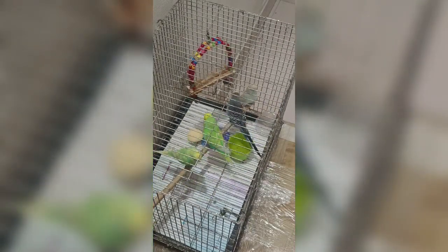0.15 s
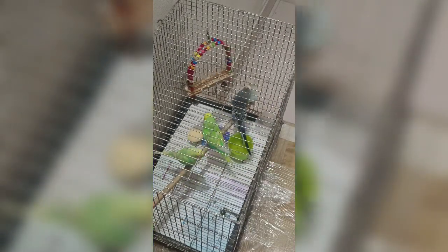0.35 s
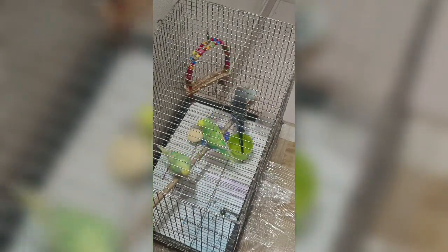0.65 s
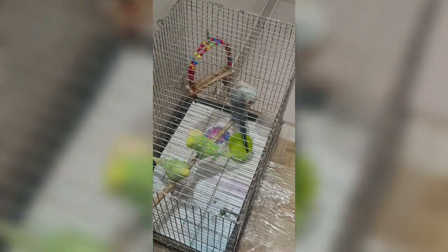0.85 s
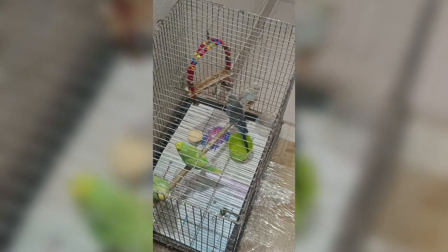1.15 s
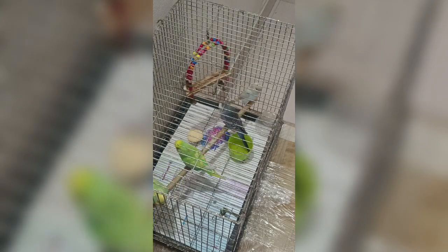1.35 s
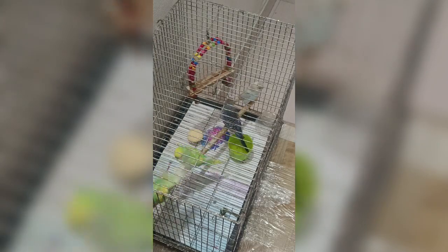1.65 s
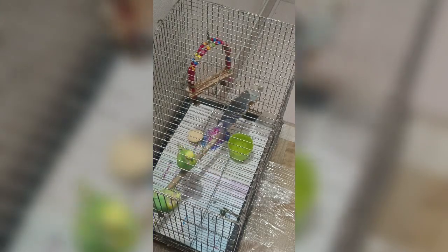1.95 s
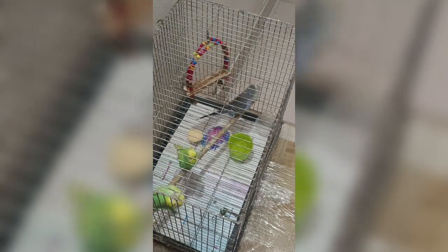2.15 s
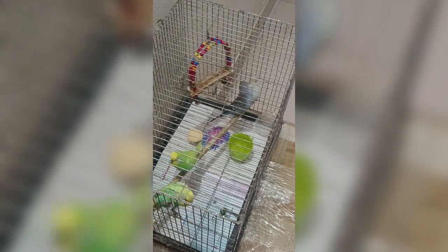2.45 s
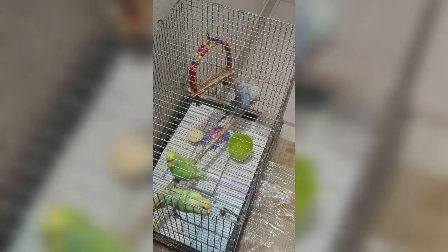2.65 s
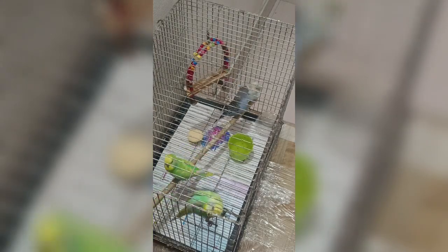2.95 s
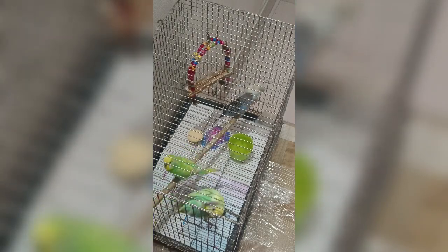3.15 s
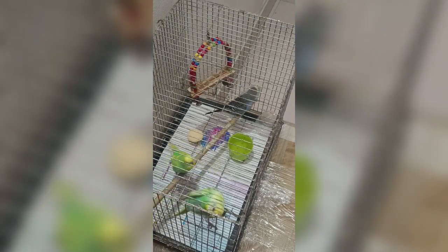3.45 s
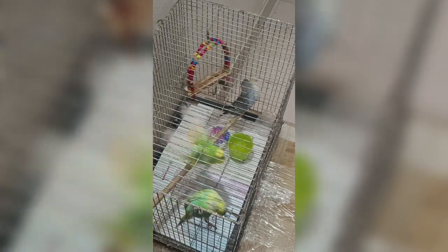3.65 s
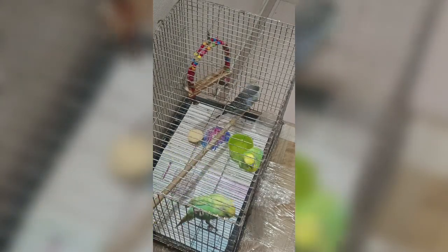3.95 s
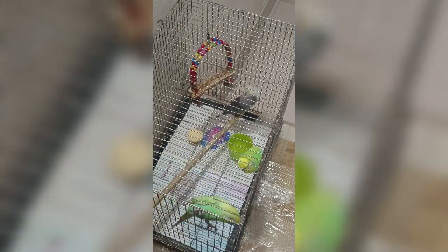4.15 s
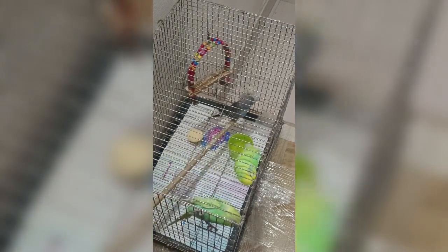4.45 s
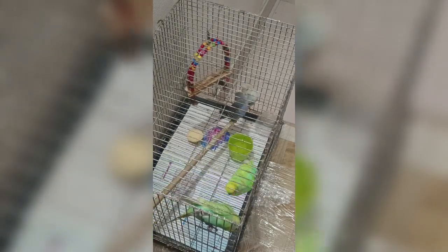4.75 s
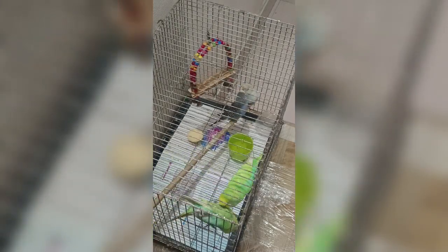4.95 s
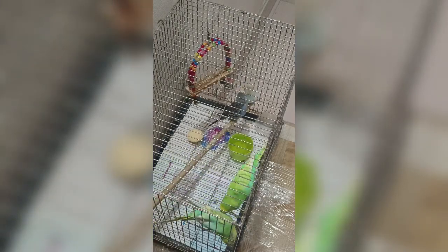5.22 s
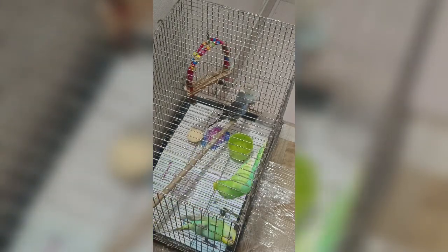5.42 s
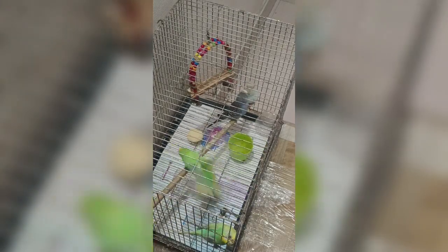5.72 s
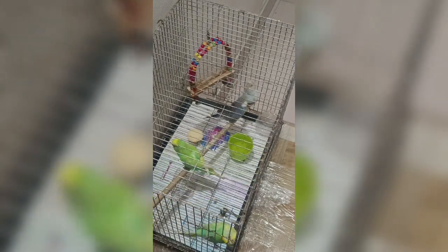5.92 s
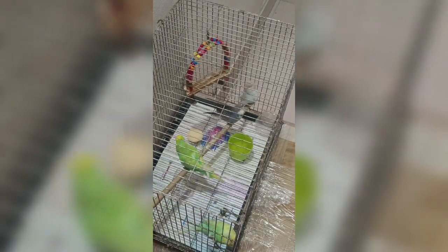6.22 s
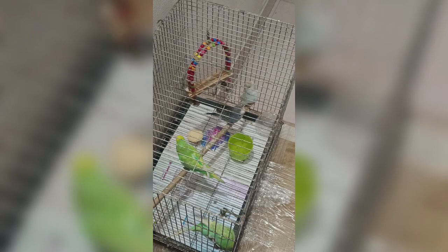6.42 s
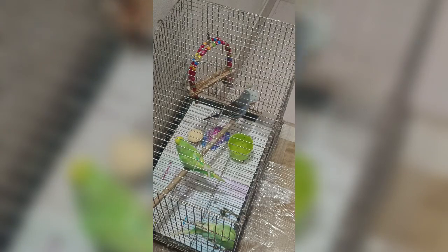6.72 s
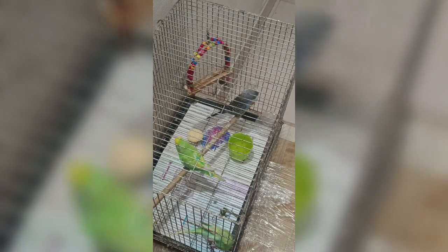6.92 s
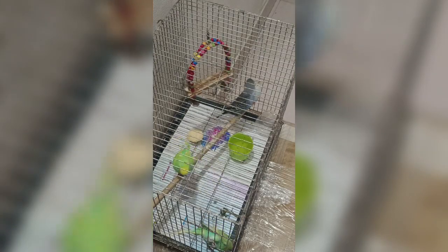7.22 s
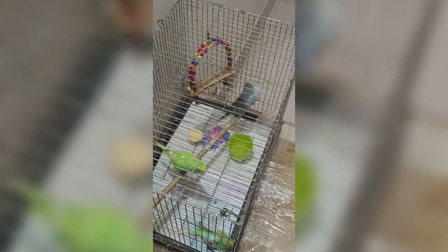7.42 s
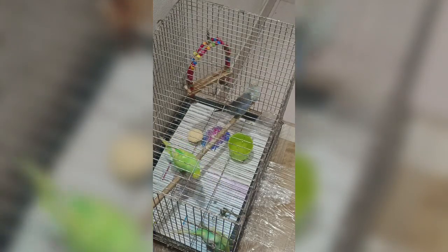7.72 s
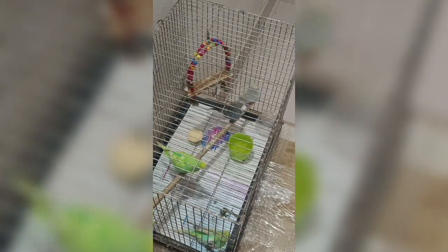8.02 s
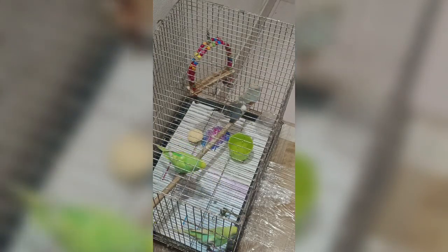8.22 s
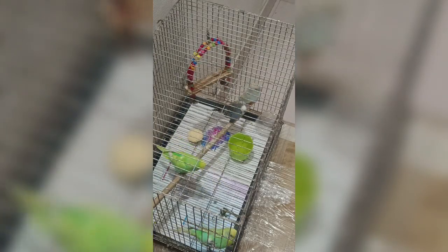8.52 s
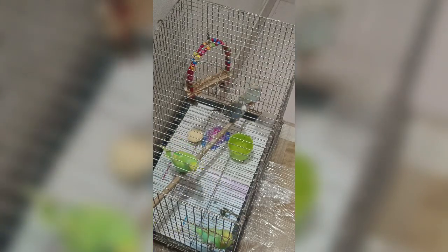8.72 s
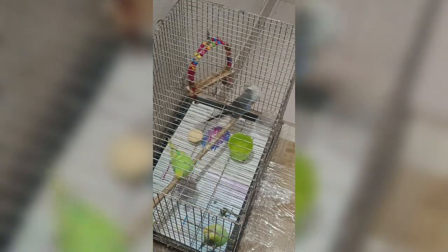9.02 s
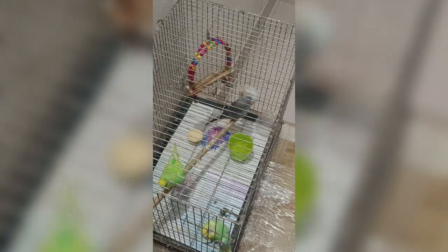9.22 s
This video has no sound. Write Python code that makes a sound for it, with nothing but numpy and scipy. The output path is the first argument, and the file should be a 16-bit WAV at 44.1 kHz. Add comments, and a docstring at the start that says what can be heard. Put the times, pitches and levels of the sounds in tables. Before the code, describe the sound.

Over a faint, steady machine hum, several small caged parrots trade quick high chirps, scratchy scolds and twittering warbles. An early scuffle brings a squawk and a rising whistle; the birds ease off, then overlap in busy runs with occasional soft coos and ringing taps on the wire. A burst of flapping comes late, amid continuing chatter. A handheld stereo microphone picks up the birds and the echo of the hard room.

```python
"""Small parrots chatter in a wire cage in a hard, echoing room while a machine hums far off. They open with
short gliding whistles, hoarse rasps, clicks on the wires and a scuffle; near 1 s comes a sharp squawk, then
a climbing whistle. After a lull the calls crowd and overlap, with a few low coos from 3.6 s on. Wings beat
hardest near 8 s, and the chatter runs to the end. All along, a handheld recorder's two sound openings
(ports) colour left and right differently, and it turns its low end down while the birds are loud."""
import sys
import numpy as np
from scipy import signal
from scipy.fft import rfft, irfft, next_fast_len
from scipy.io import wavfile
from scipy.ndimage import uniform_filter1d, minimum_filter1d, map_coordinates

SR = 44100
rng = np.random.default_rng(int(sys.argv[2]) if len(sys.argv) > 2 else 0)


def output_pcm(signal):
    """Save a mono or channel-first signal as 16-bit PCM at the path in sys.argv[1].

    Samples are clipped to [-1, 1] before scaling.
    """
    pcm = np.clip(np.atleast_2d(signal).T, -1, 1) * 32767
    wavfile.write(sys.argv[1], SR, np.round(pcm).astype(np.int16))


N = 413216
TOP_HZ, LEFT_LAG_S = 15800, 0.0003444  # highest pitch kept; how much later the left port hears


def amp(db):
    """Turns decibels into a number to multiply by."""
    return 10 ** (np.asarray(db) / 20)

def unit(x):
    """Scales x to an average strength (rms) of 1."""
    return x / np.sqrt(np.mean(x ** 2) + 1e-20)

def along(points, hz):
    """Reads between (f/Hz, value) points on a musical (log) scale."""
    f, v = np.transpose(points)
    return np.interp(np.log(hz + 1), np.log(f + 1), v)

def wobble(rate):
    """A smooth curve through `rate` random values a second."""
    coarse = np.arange(0, N + 16, 16)
    values = rng.standard_normal(int(N * rate / SR) + 5)
    return np.interp(np.arange(N), coarse, map_coordinates(values, [coarse * rate / SR]))

def filtered(x, response):
    """Scales or delays each frequency of x by response(hz)."""
    m = next_fast_len(N + SR // 2)
    return irfft(rfft(x, m) * response(np.fft.rfftfreq(m, 1 / SR)), m)[..., :N]

def add(track, s, sound):
    """Mixes a sound into a track at s seconds."""
    part = track[round(s * SR):][:len(sound)]
    part += sound[:len(part)]

def port_delay(hz):
    """The delay between the ports, half on each side."""
    return np.exp(-1j * np.pi * hz * LEFT_LAG_S * np.array([[1], [-1]]))

def noise(colour, patchy_db):
    """Noise with a (f/Hz, level/dB) colour and random louder and softer patches."""
    spectrum = signal.stft(rng.standard_normal(N), nperseg=256)[2]
    field = uniform_filter1d(rng.standard_normal(spectrum.shape), size=5, axis=0)
    field = uniform_filter1d(field, size=12, axis=1)
    patches = signal.istft(spectrum * amp(patchy_db * unit(field)), nperseg=256)[1][:N]
    return unit(filtered(patches, lambda hz: amp(along(colour, hz))))

def pips(s, hz, db, length_s=0.0158, glide=0.0279):
    """Tiny gliding tones of uneven strength, one at each time in s."""
    k = np.arange(round(length_s * SR))
    slide, loud, turn = rng.standard_normal((len(s), 3)).T[..., None]
    phase = 2 * np.pi * (hz[:, None] * (1 + glide * slide * k / len(k)) * k / SR + turn)
    tones = amp(db[:, None] + 5 * loud) * np.sin(np.pi * k / len(k)) ** 2 * np.sin(phase)
    at = np.round(s * SR).astype(int)[:, None] + k
    return np.bincount(at.ravel(), tones.ravel(), N + SR)[:N]


# The room's steady noise at each port: f/Hz, level/dB per Hz
LEFT_AIR = [(30, -100), (80, -101.5), (200, -88.5), (350, -90), (600, -100.5), (780, -83.5), (850, -65.5),
            (905, -62.5), (965, -67.5), (1020, -83), (1300, -107), (2300, -71.5), (3200, -105), (3800, -89),
            (4500, -117), (5300, -106), (6200, -130), (16000, -135)]
RIGHT_AIR = [(30, -91.5), (80, -85.5), (200, -90), (350, -91.5), (550, -101), (1900, -99), (4600, -114),
             (5400, -101), (7400, -122), (16000, -134)]
# How alike its two sides are: f/Hz, likeness (1 = the same)
AIR_LIKENESS = [(60, 0.9), (400, 1), (1000, 0.49), (3000, 0.074)]

def room_air():
    """Far air noise rings in each port; its treble flickers and its loudest band wavers."""
    turn = lambda hz: np.arccos(np.clip(along(AIR_LIKENESS, hz), -1, 1)) / 2
    share = lambda hz: np.array([np.cos(turn(hz)), np.sin(turn(hz))])
    mid, side = filtered(rng.standard_normal((2, N)), share)
    colour = lambda hz: np.sqrt(SR / 2) * amp([along(LEFT_AIR, hz), along(RIGHT_AIR, hz)])
    air = filtered(np.array([mid + side, mid - side]), lambda hz: colour(hz) * port_delay(hz))
    treble = filtered(air, lambda hz: 1 / (1 + (1600 / (hz + 1)) ** 8))
    flicker = amp(-1.5) * unit(amp(3.5 * wobble(15) + 3 * wobble(3)))
    band = filtered(air, lambda hz: np.exp(-((hz - 900) / 250) ** 2))
    waver = unit(amp(3 * wobble(8)))
    return air + (flicker - 1) * treble + (waver - 1) * band

# The machine's tones: f/Hz, width/Hz, level/dB
HUM_TONES = [(105.1, 8.5, -63.5), (135, 6.1, -73), (295, 45, -64), (415, 57, -72), (717, 8.1, -78)]

def machine_hum():
    """A far machine hums in narrow, wavering bands of noise; the higher ones lean left."""
    hum = np.zeros((2, N))
    for centre_hz, width_hz, db in HUM_TONES:
        tone = filtered(rng.standard_normal(N), lambda hz: np.exp(-((hz - centre_hz) / width_hz) ** 2))
        lean_db = (centre_hz - 200) / 80
        hum += amp([[db + lean_db], [db - lean_db]]) * unit(tone)
    return hum

# Time the far echo takes to fade by 60 dB: f/Hz, fade/s
ECHO_FADES = [(500, 0.7), (2500, 0.69), (4500, 0.58), (12000, 0.35)]

def room_echo(x, near_fade_s=0.23, far_db=-6):
    """The cage and nearest wall answer briefly, the rest of the room longer, differently at each port."""
    hz, t, spectrum = signal.stft(rng.standard_normal((2, SR // 2)), SR, nperseg=256)
    fade = amp(-60 * t / near_fade_s) + amp(far_db - 60 * t / along(ECHO_FADES, hz)[:, None])
    tail = signal.istft(spectrum * fade, SR, nperseg=256)[1]
    tail /= np.linalg.norm(tail[0])
    return signal.fftconvolve(np.pad(x, (300, 0))[None], tail, axes=1)[:, :N]

# Wings and feet on the cage floor, one list a scuffle: t/s, rattle level/dB, thump against rattle/dB
SCUFFLE_CURVES = [
    [(0.55, -42, -49), (.7, -38.5, -27), (0.93, -35, -43.5), (1.0, -66, 5)],
    [(3.87, -82, 3), (3.95, -76, 15.5), (4.04, -91, 3)],
    [(7.794, -41, -11), (7.806, -23.5, -29), (7.85, -23.5, -29), (7.9, -30.5, -15.5), (8.02, -33, -16),
     (8.25, -68, 0)],
    [(9.05, -44, -17), (9.224, -34, -34), (9.37, -53, -32)],
]

def scuffles():
    """Beating wings rattle the tray and thump the air."""
    rattle, thump = np.zeros((2, N))
    t = np.arange(N) / SR
    for rows in SCUFFLE_CURVES:
        s, db, thump_db = np.transpose(rows)
        rattle += amp(np.interp(t, s, db, -120, -120))
        thump += amp(np.interp(t, s, db + thump_db, -120, -120))
    beats = unit(amp(1.1 * wobble(40)))
    tray = noise([(550, -29), (700, -15), (900, 4.5), (1150, -8), (1700, -3), (2400, -2.5),
                  (4000, -91.5)], patchy_db=1.5)
    air = noise([(40, -35), (100, -4), (200, -23.5), (400, -3), (650, -13), (1500, -72)], patchy_db=1.5)
    return beats * (rattle * filtered(tray, port_delay) * amp([[3.5], [-3.5]]) + thump * air)

# Low, soft notes: t/s, level/dB, f/Hz
COO_NOTES = [(3.632, -39.5, 302), (3.799, -40.5, 393), (5.822, -32, 414), (8.021, -40.5, 439),
             (8.16, -46.5, 305), (9.172, -51.5, 349)]

def coos():
    """Soft, rough low notes that rise a little."""
    out = np.zeros(N)
    progress = np.linspace(0, 1, round(.075 * SR))
    flutter, waver = amp(8.2 * wobble(90)), wobble(70)
    for s, db, hz in COO_NOTES:
        shake = 1 + .05 * waver[round(s * SR):][:len(progress)]
        phase = 2 * np.pi * np.cumsum(hz * (.93 + 0.16 * progress) * shake) / SR
        tone = np.sin(phase) + 0.25 * np.sin(1.4 * phase)
        add(out, s - .01, amp(db - 4.5) * np.sin(np.pi * progress) * tone)
    return out * flutter

# Claws and beaks on the wire: t/s, level/dB, top f/Hz
WIRE_TAPS = [(.573, -22.5, 4700), (.667, -22.5, 5400), (0.775, -25.5, 5040), (1.361, -24.5, 6500),
             (2.082, -19, 2600), (2.141, -31, 3450), (3.9291, -20.5, 5400), (5.714, -23, 6170),
             (6.76, -29, 3300), (6.901, -21.5, 2800), (7.807, -22, 7160), (9.244, -40, 7560)]
WIRE_HZ, WIRE_FADE_S, WIRE_DB = (2274, 2913, 3710, 4320, 4920, 6280), 0.055, -11.5

def wire_clicks():
    """A claw or beak makes a short snap that sets the bars ringing."""
    out = np.zeros(N)
    t = np.arange(2048) / SR
    hz = np.fft.rfftfreq(len(t), 1 / SR)
    for s, db, top_hz in WIRE_TAPS:
        contact = 1 - np.exp(-t * top_hz * amp(db + 13))  # light touches build up more slowly
        snap = contact * amp(db + 11 - 60 * t / 0.013) * rng.standard_normal(len(t))
        for bar_hz in WIRE_HZ:
            ring = amp(db + WIRE_DB + rng.normal(0, 3.5) - 60 * t / WIRE_FADE_S)
            snap += ring * np.sin(2 * np.pi * bar_hz * t)
        band = 1 / (1 + 1j * hz / top_hz) ** 6 * (1j * hz / (1100 + 1j * hz)) ** 6
        add(out, s, irfft(rfft(snap) * band * amp(14)))
    return out

# Hoarse scolding bursts: t/s, level/dB, treble against that level/dB
RASP_BURSTS = [(0.09, -26, -27), (0.194, -16, -28.5), (0.327, -17, -33), (0.551, -27, -28),
               (0.651, -27, -30.5), (0.897, -14.5, -32), (1.079, -16, -20.5), (1.198, -17.5, -31),
               (2.591, -30, -40), (2.68, -38, -39), (2.8, -30.5, -34), (2.93, -21.5, -21.5),
               (3.057, -18.5, -21.5), (3.139, -32.5, -21.5), (3.228, -20, -31), (3.4, -22, -24.5),
               (3.508, -26.5, -27), (3.918, -31.5, -32.5), (4.117, -15, -26.5), (4.319, -13, -32),
               (4.403, -14.5, -28), (4.495, -17, -29.5), (4.729, -18, -25.5), (4.819, -21.5, -24.5),
               (4.957, -15.5, -39.5), (5.376, -18.5, -32), (5.524, -17.5, -31.5), (5.705, -24.5, -47),
               (5.895, -16, -30.5), (6.162, -23.5, -29.5), (7.053, -32.5, -26), (7.324, -13, -30.5),
               (7.504, -16, -39), (7.642, -15.5, -26.5), (7.711, -21.5, -19), (7.802, -21, -14),
               (7.945, -15, -20.5), (8.047, -20.5, -19.5), (8.148, -50.5, 10.5), (8.39, -18.5, -18),
               (8.486, -17.5, -24), (8.651, -31, -27), (8.766, -16, -24.5), (8.88, -15, -21.5),
               (8.972, -20.5, -30.5), (9.239, -19, -21.5), (9.315, -29.5, -17)]
# Thin, very high hisses: t/s, level/dB
HISS_BURSTS = [(0.911, -55.5), (1.0886, -43), (1.1594, -56.5), (2.968, -56.5), (3.0586, -50.5),
               (3.1378, -54.5), (3.306, -62.5), (3.925, -58.5), (4.027, -55), (4.2003, -57),
               (4.3345, -44.5), (4.4188, -48.5), (4.4994, -58.5), (4.742, -46.5), (4.834, -57),
               (4.9397, -64), (5.1483, -58), (5.3542, -50.5), (5.904, -45.5), (6.016, -46.5),
               (6.1666, -53.5), (7.482, -51.5), (7.5557, -55.5), (7.7077, -52), (7.803, -29),
               (7.8806, -45.5), (7.962, -35.5), (8.06, -44.5), (8.1833, -46.5), (8.4004, -44),
               (8.514, -44.5), (8.7794, -47.5), (8.878, -49), (9.2604, -51), (9.3184, -47)]
# Colours of a rasp, its sizzling treble and a hiss: f/Hz, level/dB
RASP_COLOUR = [(1100, -26.5), (1600, -12.5), (2800, 4), (3800, -5.5), (4300, -14.5), (4800, -3),
               (5900, -15.5), (6600, -18), (7200, -17.5), (9000, -44.5)]
SIZZLE_COLOUR = [(6500, -31), (7800, 0.5), (9500, -8), (10500, -11.5), (12000, -21.5)]
HISS_COLOUR = [(11000, -42), (12200, 0), (13300, -8.5), (14500, -1.5), (16000, -4.5)]

def rasps(rise_s=.016, fade_s=0.084, pips_db=-2):
    """Rasps and hisses are quick swells of breath chopped by the throat; tiny pips ring in the rasps."""
    body, bright, thin = np.zeros((3, N))
    t = np.arange(SR // 5) / SR
    swell = (1 - np.exp(-(t / rise_s) ** 2)) * np.exp(-(t / fade_s) ** 2)
    for s, db, treble_db in RASP_BURSTS:
        add(body, s, amp(db - 12) * swell)
        add(bright, s, amp(db + treble_db - 9) * swell * np.minimum(t / 0.02, 1))
    for s, db in HISS_BURSTS:
        add(thin, s - .005, amp(db - 9) * swell)
    chop = unit(amp(3 * wobble(150)))
    scratch = unit(amp(4.5 * wobble(220) + 2.5 * wobble(35)))
    when, height = rng.random((2, 3500))
    shower = pips(when * N / SR, 1300 * 5 ** height, db=np.zeros_like(when))
    ringing = filtered(shower, lambda hz: amp(along(RASP_COLOUR, hz)))
    hoarse = .6 * noise(RASP_COLOUR, patchy_db=4.5) + amp(pips_db) * unit(ringing)
    treble = bright * noise(SIZZLE_COLOUR, patchy_db=4.5) + thin * noise(HISS_COLOUR, patchy_db=-1)
    return chop * body * hoarse + scratch * treble

# High warbles: t/s, length/s, level/dB, centre f/Hz
TWITTER_CALLS = [(0.323, 0.051, -36, 5850), (0.664, 0.047, -32, 5000), (0.9, 0.19, -36.5, 5720),
                 (1.079, 0.19, -27, 5400), (1.349, 0.062, -33.5, 5090), (3.008, 0.042, -41, 5460),
                 (3.041, 0.3, -31, 5836), (3.458, 0.047, -37, 5960), (3.513, 0.069, -34, 5805),
                 (3.92, 0.048, -34.5, 4920), (4.118, 0.17, -33, 5970), (4.325, 0.32, -31, 5615),
                 (4.716, 0.24, -32, 6020), (5.06, 0.065, -35.5, 5280), (5.305, 0.14, -34.5, 5330),
                 (5.531, 0.096, -33.5, 5820), (5.716, 0.12, -34.5, 5500), (5.962, 0.06, -39, 5900),
                 (6.172, 0.081, -34, 5466), (7.053, 0.063, -35, 6080), (7.327, 0.19, -35.5, 5780),
                 (7.616, 0.037, -34.5, 6070), (7.653, 0.26, -32, 5867), (7.965, 0.035, -37, 5202),
                 (8.055, 0.21, -30, 6100), (8.381, 0.25, -33, 5910), (8.778, 0.29, -34, 5950),
                 (9.25, 0.14, -30.5, 6014)]

def twitters(pips_per_s=260, spread=0.0597):
    """A high warble is a shower of pips that swells in and spreads down in pitch."""
    rows = []
    for s, length, db, hz in TWITTER_CALLS:
        count = int(length * pips_per_s) + 3
        progress, scatter = rng.random(count), np.abs(rng.standard_normal(count))
        times = s - .01 + .85 * length * progress
        pitches = hz * (1.05 - spread * (.4 + 1.58 * progress) * scatter)
        levels = db - 5 - 6 * (1 - progress) ** 4 - 3 * progress
        rows += zip(times, pitches, levels)
    return pips(*np.transpose(rows))

def hoarseness(db, hz):
    """How much a note's pitch trembles: soft, low notes are the roughest."""
    return np.clip(.0032 * (-12 - db), .022, .09) * np.sqrt(3600 / hz)

# Short whistles: t/s, length/s, start f/Hz, end f/Hz, level/dB
CHIRP_NOTES = [(0.072, 0.1, 1566, 2440, -31.5), (0.087, 0.07, 3400, 4050, -30),
               (0.096, .09, 5110, 5600, -45.5), (0.218, 0.077, 6550, 6670, -46.5),
               (0.161, 0.085, 2980, 2306, -23.5), (0.245, 0.046, 2206, 2378, -21.5),
               (0.409, 0.08, 1988, 1552, -32.5), (0.466, 0.044, 2433, 2382, -21),
               (0.575, 0.0566, 2460, 2183, -31.5), (.614, 0.044, 1637, 1490, -33.5),
               (.615, 0.021, 2900, 3190, -31), (0.635, 0.041, 2262, 2740, -24),
               (0.655, 0.028, 4190, 3600, -25.5), (0.762, 0.13, 2486, 2250, -37.5),
               (0.766, 0.023, 4220, 3690, -28), (0.923, 0.0447, 1900, 2155, -28),
               (1.093, 0.135, 2087, 1948, -40.5), (1.124, 0.063, 3605, 2347, -24),
               (1.161, 0.09, 3775, 3160, -28), (1.298, 0.026, 1977, 1970, -31.5),
               (1.295, 0.024, 3823, 3820, -24.5), (2.066, 0.055, 2497, 2160, -37.5),
               (2.135, 0.03, 2227, 2180, -34), (2.201, 0.051, 1975, 1950, -32),
               (2.215, 0.03, 3656, 3754, -28.5), (2.527, 0.064, 2320, 2106, -34.5),
               (2.6, 0.074, 2970, 3643, -30.5), (2.651, 0.09, 2647, 2513, -28.5),
               (2.656, 0.15, 2302, 1666, -34.5), (2.831, 0.096, 2498, 2280, -32),
               (2.924, 0.046, 6520, 5840, -47.5), (2.966, 0.051, 7120, 6870, -43),
               (3.394, 0.0487, 6080, 5800, -43.5), (2.956, 0.047, 2747, 2325, -36.5),
               (3.044, 0.039, 2610, 3110, -35.5), (3.181, 0.059, 3670, 2690, -26),
               (3.187, 0.023, 2930, 2820, -26), (3.236, 0.028, 2294, 2365, -24.5),
               (3.263, 0.042, 3417, 2990, -25.5), (3.612, 0.04, 1697, 2145, -30),
               (3.615, 0.044, 2280, 2980, -35.5), (3.822, 0.098, 2606, 2160, -38.5),
               (3.918, 0.078, 2138, 2270, -31.5), (3.943, 0.047, 2845, 2547, -25.5),
               (3.97, 0.062, 3520, 3110, -35.5), (3.994, 0.078, 2637, 2572, -22.5),
               (4.061, 0.046, 2072, 2550, -19.5), (4.317, 0.029, 2970, 3770, -22.5),
               (4.361, 0.085, 4144, 4214, -24.5), (4.363, 0.059, 3000, 3210, -23.5),
               (4.406, 0.048, 2225, 2190, -27), (4.423, 0.026, 3760, 3327, -20),
               (4.469, 0.1, 4120, 3930, -33.5), (4.609, 0.05, 2550, 2390, -33),
               (4.646, 0.073, 2055, 1875, -33.5), (4.666, 0.039, 2500, 2485, -25),
               (4.789, 0.055, 1823, 1500, -37), (4.979, 0.05, 3648, 3730, -20.5),
               (4.99, 0.0084, 2940, 3240, -15.5), (4.993, 0.024, 1916, 1870, -27),
               (5.021, 0.042, 2990, 2613, -22), (5.207, 0.077, 1523, 2240, -33.5),
               (5.271, 0.1115, 2342, 2404, -23.5), (5.349, 0.086, 4410, 4060, -31.5),
               (5.355, 0.0548, 2490, 2133, -23), (5.44, 0.043, 2052, 2487, -29.5),
               (5.549, 0.072, 2655, 2510, -41), (5.713, 0.018, 3460, 3730, -24),
               (5.714, 0.02, 2370, 2240, -30), (5.754, 0.074, 3096, 2547, -37),
               (5.966, 0.0645, 2530, 2116, -21), (6.021, 0.032, 3000, 3110, -17),
               (6.029, 0.056, 3615, 3720, -29), (6.075, 0.068, 2733, 2660, -25.5),
               (6.107, 0.065, 2127, 1871, -27.5), (6.142, 0.075, 2680, 2650, -23),
               (6.756, 0.037, 2214, 2267, -34.5), (7.054, 0.0336, 2190, 1905, -29),
               (7.237, 0.11, 1844, 1475, -38), (7.28, 0.053, 3487, 3620, -26),
               (7.297, 0.048, 2714, 2400, -25.5), (7.53, 0.042, 3480, 4185, -26),
               (7.533, 0.051, 1930, 2195, -26), (7.544, 0.07, 2957, 2970, -22),
               (7.654, 0.0401, 2800, 3060, -36), (7.902, 0.05, 3290, 3860, -32),
               (7.945, 0.068, 2663, 2700, -29), (8.146, 0.0514, 3119, 2595, -32.5),
               (8.376, 0.025, 2875, 2818, -29.5), (8.424, 0.042, 2395, 2395, -37.5),
               (8.51, 0.012, 1970, 1928, -21), (8.747, 0.028, 3296, 3380, -18.5),
               (8.713, 0.052, 1690, 1738, -34), (8.757, 0.0494, 1850, 2346, -27),
               (8.795, 0.063, 2797, 2840, -25.5), (8.825, 0.0406, 2340, 2627, -22),
               (8.847, 0.0613, 2312, 1940, -25.5), (8.863, 0.022, 3880, 4000, -18),
               (8.992, 0.02, 3504, 3530, -27.5), (9.023, 0.079, 2434, 2448, -22.5),
               (9.105, 0.018, 1995, 1570, -24.5), (9.22, 0.032, 2784, 2820, -35),
               (9.28, 0.018, 2363, 2350, -26), (9.329, 0.065, 2990, 2515, -34)]

def chirps():
    """Each chirp glides evenly in pitch; hoarse ones start more gently."""
    for s, length, from_hz, to_hz, db in CHIRP_NOTES:
        t = np.arange(round(length * SR)) / SR
        rough = hoarseness(db, from_hz)
        yield s, from_hz + (to_hz - from_hz) * t / length, db, rough, .004 + .1 * rough, .012

# Sharp, bending calls: t/s, length/s, start f/Hz, settled f/Hz, level/dB
SQUAWK_NOTES = [(0.922, 0.039, 4390, 3625, -17.5), (3.929, 0.023, 5180, 2890, -23.5),
                (4.289, 0.033, 4900, 2900, -17), (4.932, 0.034, 4680, 3000, -16),
                (5.905, 0.041, 5160, 2617, -17.5), (7.053, 0.046, 4280, 3670, -21),
                (7.472, 0.038, 4480, 3006, -16), (8.529, 0.04, 3440, 4185, -18.5)]

def squawks(settle_s=0.0098, hook_hz=350, soft_start_db=-4.5):
    """A squawk swells as it bends quickly to a new pitch, then hooks up at the end."""
    for s, length, from_hz, to_hz, db in SQUAWK_NOTES:
        t = np.arange(round(length * SR)) / SR
        settled = 1 - np.exp(-t / settle_s)
        pitch = from_hz + (to_hz - from_hz) * settled + hook_hz * (t / length) ** 6
        yield s, pitch, db + soft_start_db * (1 - settled), .01 * settled ** 2, .002, .008

# Long, rising calls: t/s, length/s, start f/Hz, top f/Hz, level/dB
WHISTLE_NOTES = [(0.983, 0.15, 2610, 3617, -15), (5.049, 0.18, 2540, 3373, -17),
                 (5.232, 0.089, 3254, 5290, -28.5), (7.109, 0.17, 2450, 3566, -19.5),
                 (8.578, 0.13, 2296, 3375, -16)]

def climbing_whistles(climb_s=.082):
    """A whistle climbs ever faster, then holds its top more softly."""
    for s, length, from_hz, top_hz, db in WHISTLE_NOTES:
        t = np.arange(round(length * SR)) / SR
        climb = np.clip(t / climb_s, 0, 1) ** 2.1
        pitch = from_hz + (top_hz - from_hz) * climb
        yield s, pitch, db - 3.5 * climb, hoarseness(db, from_hz) * (1.4 - 1.05 * climb), .008, .012
        # the other half of the bird's voice box adds a rough voice just below
        yield s + .01, 0.97 * pitch, db - 4 - 10 * climb, .05, .01, .02

# Fainter tones above a note: multiple of its pitch, level/dB
VOICE_OVERTONES = [(2, -28.5), (3, -46), (4, -53)]

def parrot_voices(notes):
    """A thin skin in the voice box sings each note, trembling in pitch and strength."""
    out = np.zeros(N)
    tremor, flutter = wobble(420), wobble(260)
    breath = unit(filtered(rng.standard_normal(N), lambda hz: 1 / (1 + (hz / 1100) ** 6)))
    haze = 1 + .06 * breath  # swirling air blurs the tone
    for s, glide_hz, db, rough, fade_in_s, fade_out_s in notes:
        t = np.arange(len(glide_hz)) / SR
        here = (round(s * SR) + np.arange(len(t))) % N
        pitch = glide_hz * (1 + rough * tremor[here])
        phase = 2 * np.pi * np.cumsum(pitch) / SR
        tone = np.sin(phase)
        if glide_hz[0] < 5000:
            for k, overtone_db in VOICE_OVERTONES:
                tone += amp(overtone_db) * np.sin(k * phase) * (k * pitch < TOP_HZ)
        swell = np.clip(t / fade_in_s, 0, 1) * np.clip(t[::-1] / fade_out_s, 0, 1)
        add(out, s, amp(db + 3 + 1.36 * flutter[here]) * swell * tone * haze[here])
    return out


# Pitches that the recorder's case weakens: f/Hz, width/Hz, level/dB
CASE_DIPS = [(1041, 234, -20), (4320, 76, -2)]
# How its two ports differ: f/Hz, left minus right level/dB
PORT_BALANCE = [(1200, -10), (1800, 5), (2700, 8), (3800, 3), (4600, -3), (5300, -1.5), (6000, -14.5),
                (7000, -11), (8000, 4), (9300, 18), (11000, -2), (13000, 3), (15500, -12)]

def port_colour(hz):
    """The case muffles two bands, and each port favours its own pitches."""
    case_db = sum(db * np.exp(-((hz - centre) / width) ** 2) for centre, width, db in CASE_DIPS)
    return amp(case_db + along(PORT_BALANCE, hz) / 2 * np.array([[1], [-1]]))

def scene():
    """The flock, heard straight and off the walls, over air and hum that swell and sink together."""
    notes = [*chirps(), *squawks(), *climbing_whistles()]
    flock = parrot_voices(notes) + twitters() + rasps() + wire_clicks()
    flock_in_room = amp(-3.5) * filtered(flock, port_delay) + amp(1) * room_echo(flock)
    cooing = coos()
    coos_in_room = cooing * amp([[1.5], [-1.5]]) + amp(-9) * room_echo(cooing)
    wings = scuffles()
    background = (room_air() + machine_hum()) * unit(amp(2.2 * wobble(4)))
    return background + wings + coos_in_room + filtered(flock_in_room, port_colour)

def record(dry, peak_limit=.56):
    """The recorder lowers the low end when it is loud, holds peaks down and cuts deep bass and the top."""
    power = np.abs(uniform_filter1d(np.mean(dry ** 2, 0), size=2200))
    low = filtered(dry, lambda hz: 1 / (1 + (hz / 1450) ** 10))
    low_gain = (1 + power / amp(-17.5) ** 2) ** -1.3
    thinned = dry + (low_gain - 1) * low
    peak_gain = np.minimum(1, peak_limit / (np.abs(thinned).max(0) + 1e-9))
    held = thinned * uniform_filter1d(minimum_filter1d(peak_gain, size=400), size=400)
    return filtered(held, lambda hz: (hz < TOP_HZ) * hz ** 2 / (hz ** 2 + 45 ** 2))


dry = scene()
out = record(dry)
output_pcm(out)
```